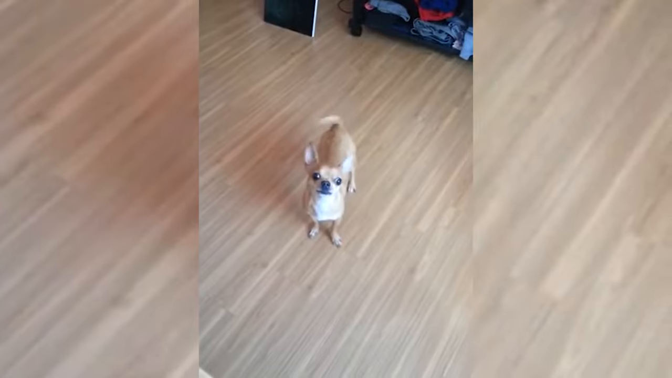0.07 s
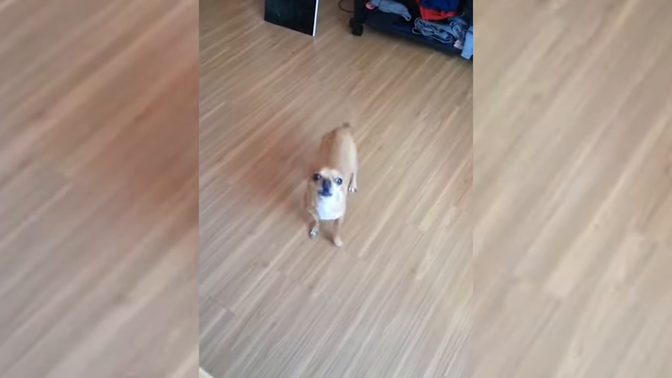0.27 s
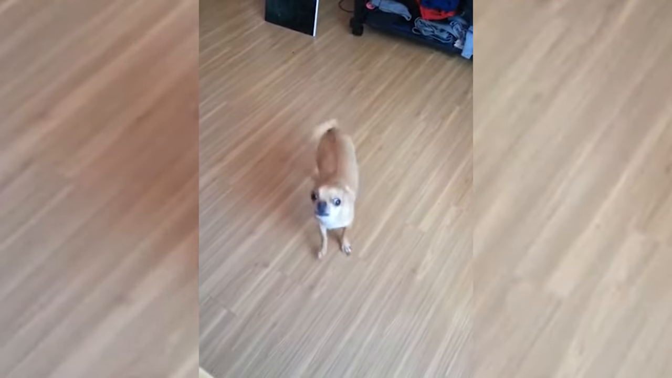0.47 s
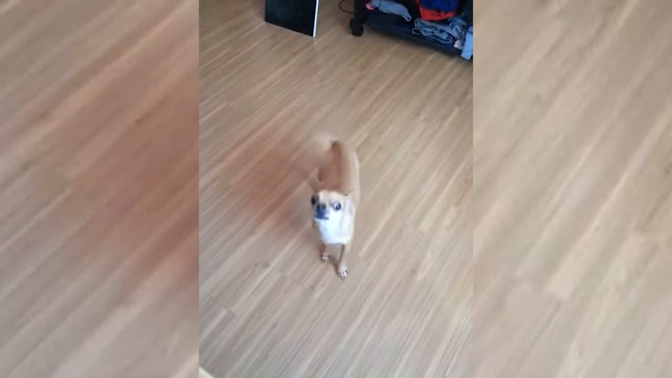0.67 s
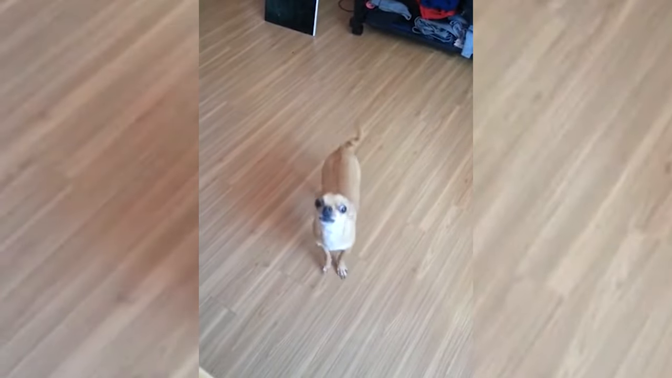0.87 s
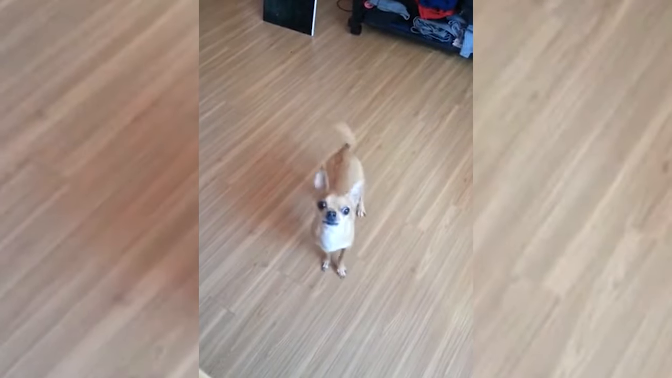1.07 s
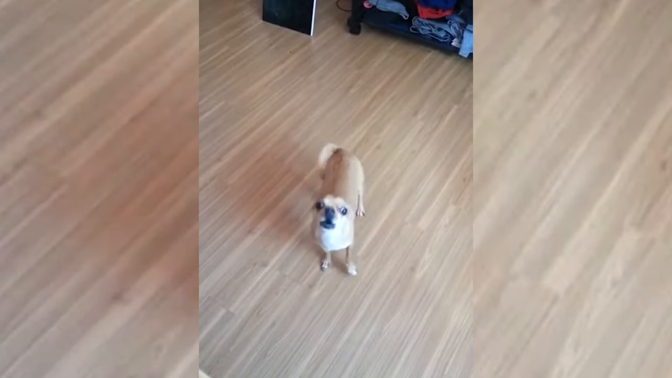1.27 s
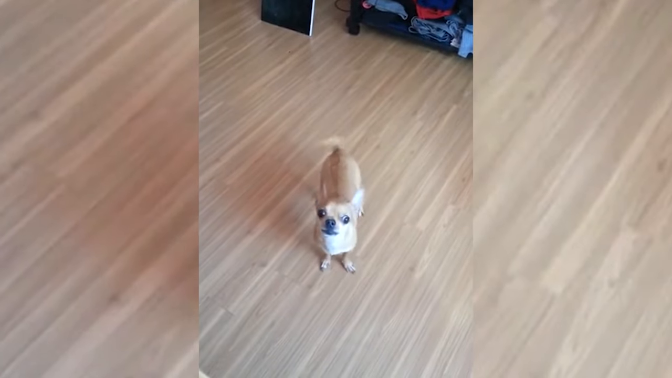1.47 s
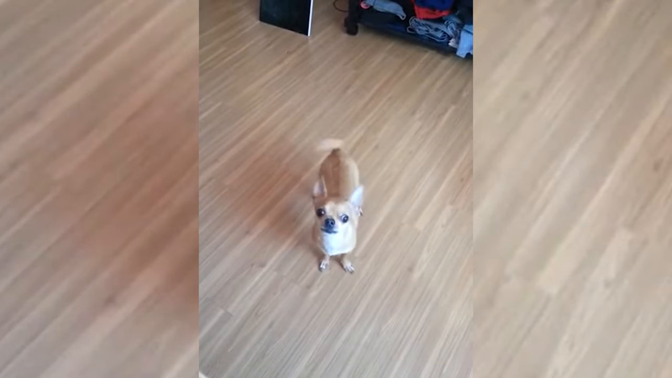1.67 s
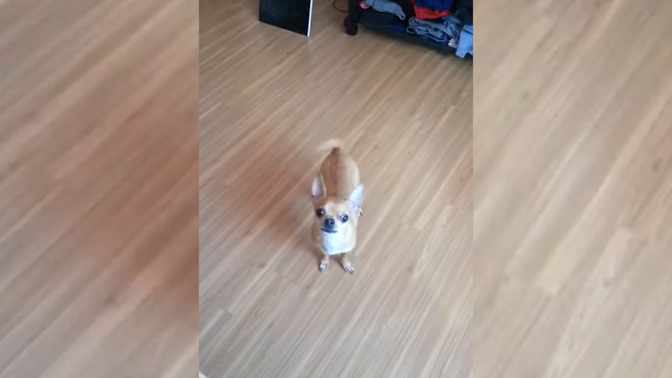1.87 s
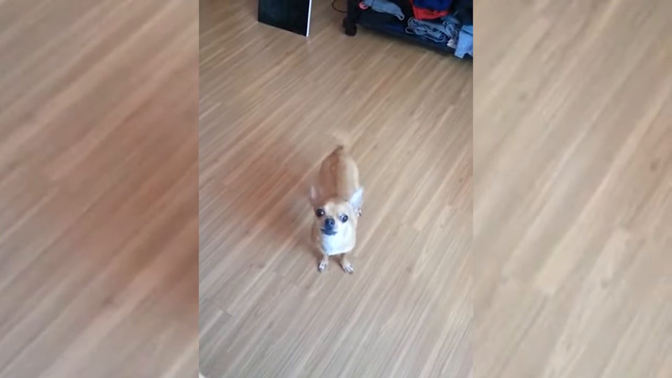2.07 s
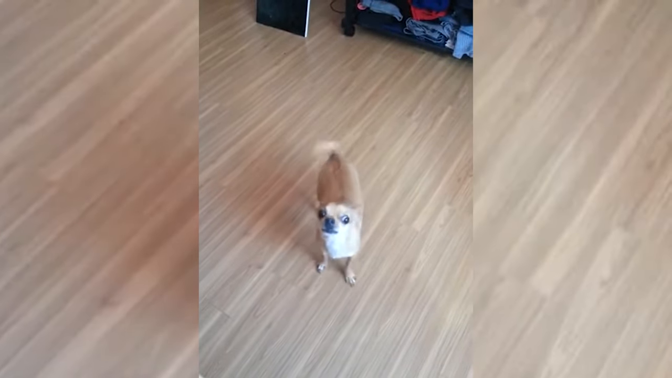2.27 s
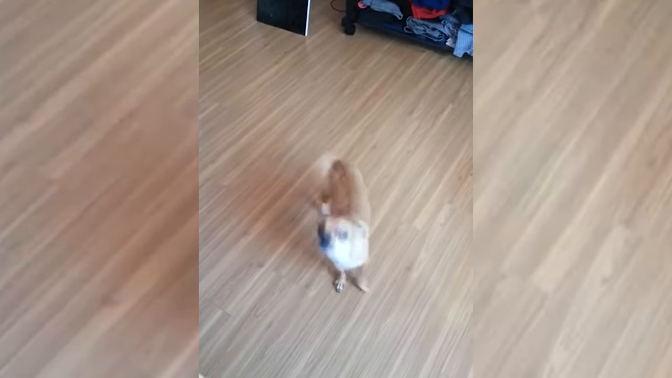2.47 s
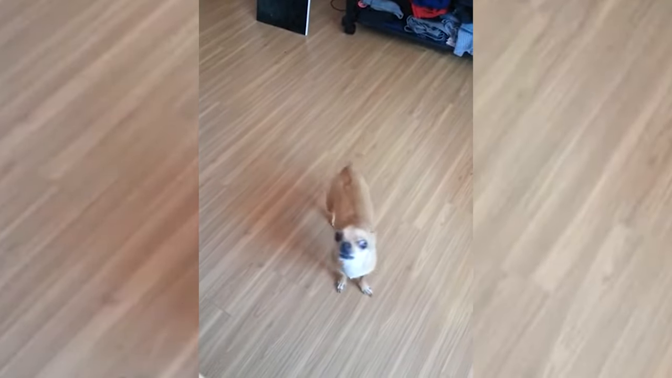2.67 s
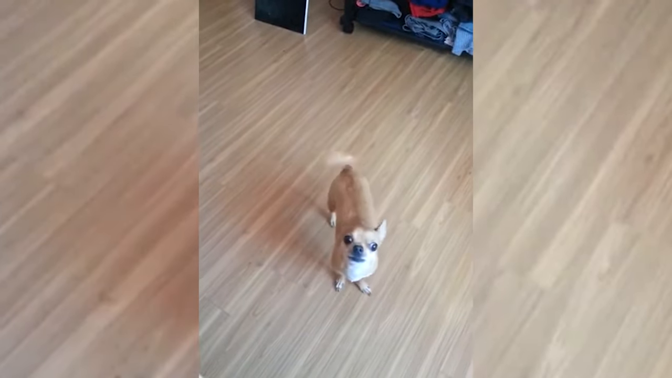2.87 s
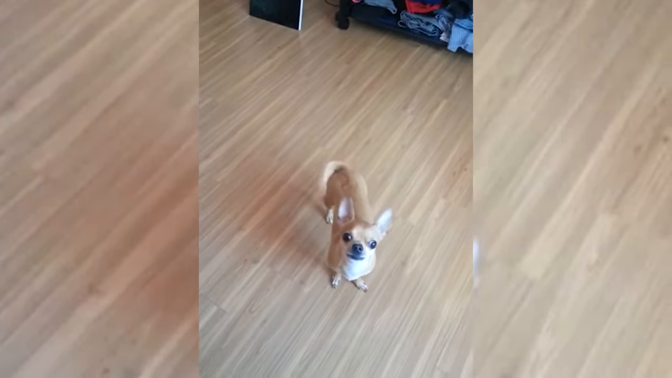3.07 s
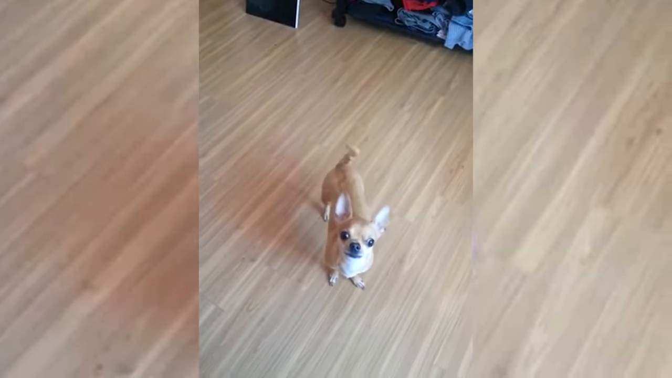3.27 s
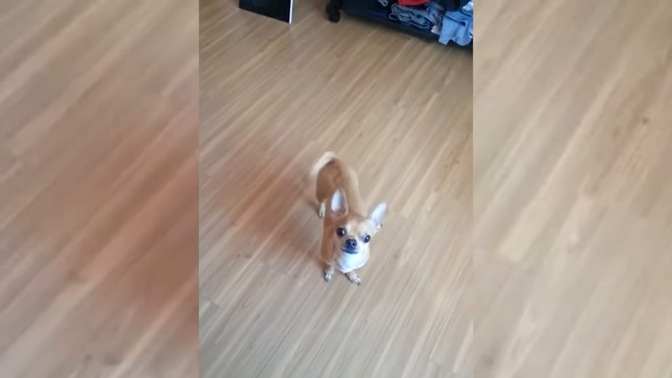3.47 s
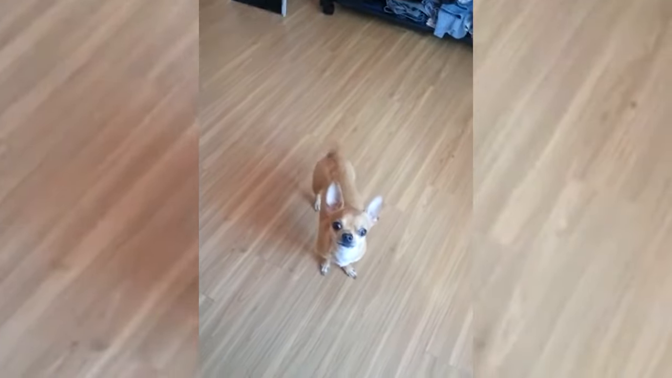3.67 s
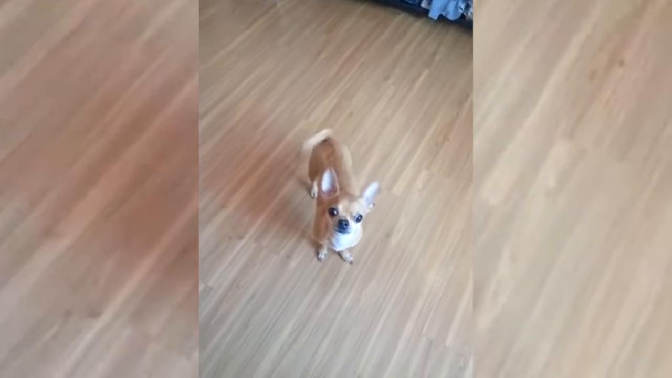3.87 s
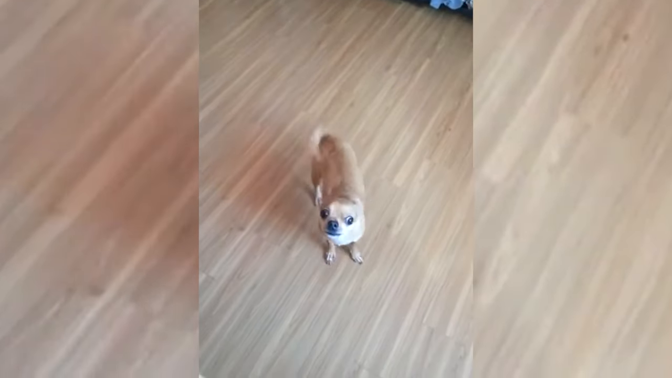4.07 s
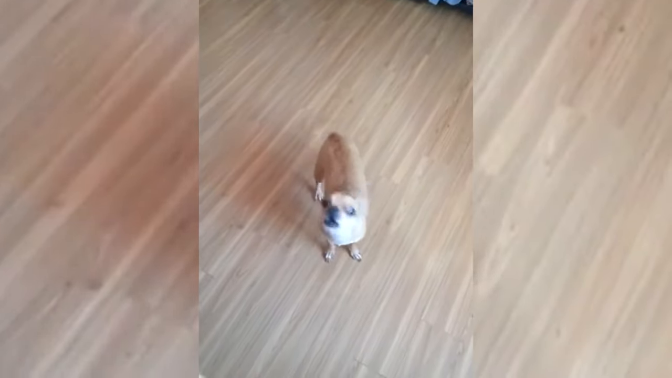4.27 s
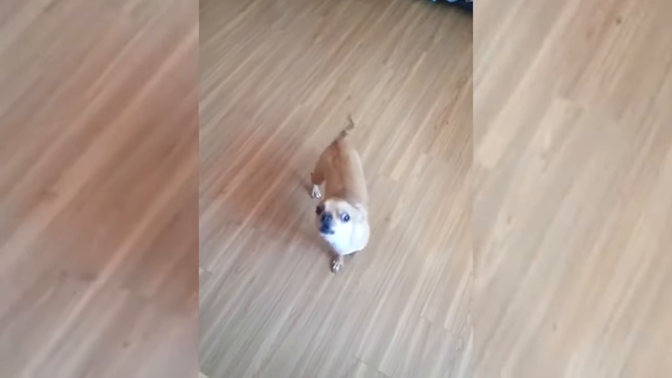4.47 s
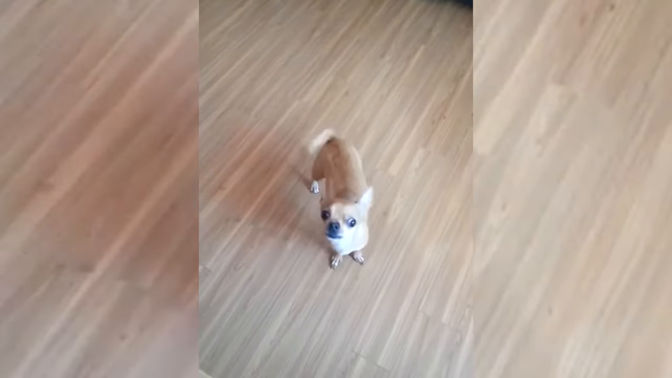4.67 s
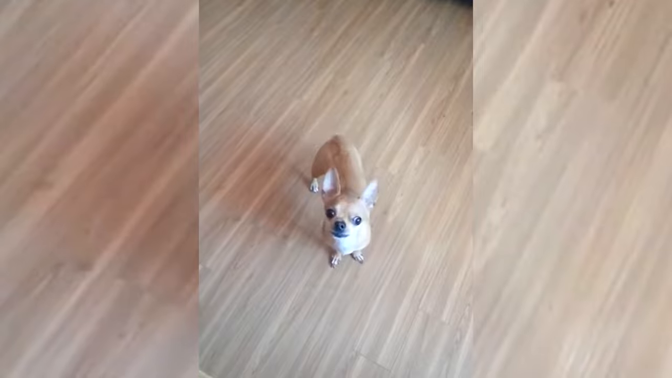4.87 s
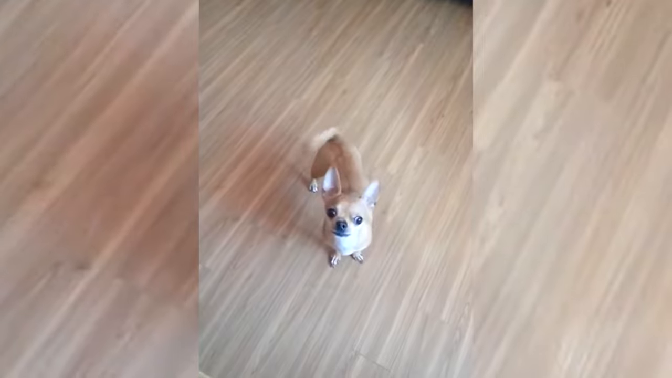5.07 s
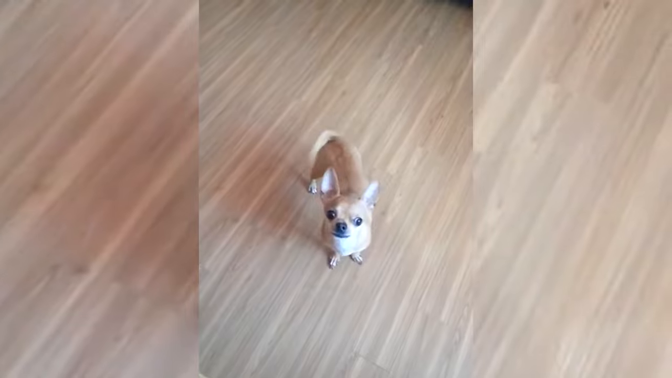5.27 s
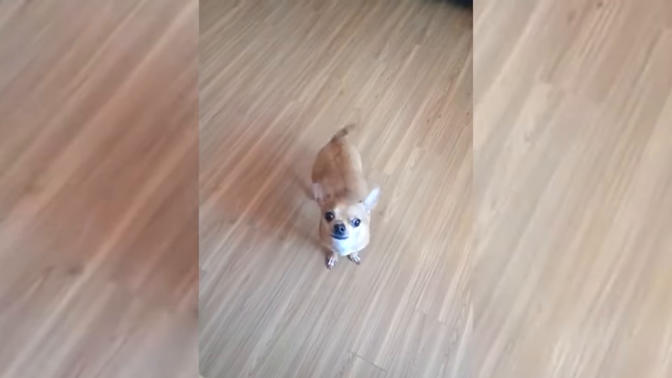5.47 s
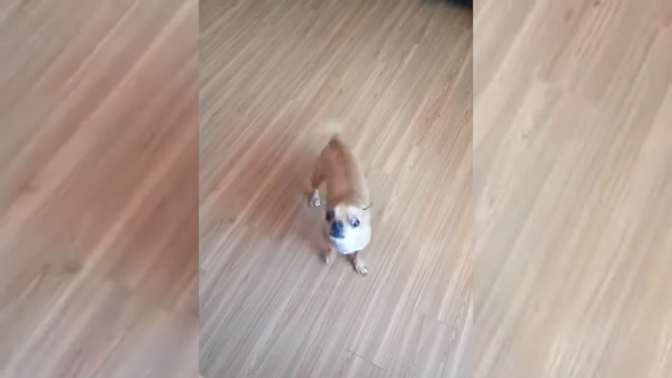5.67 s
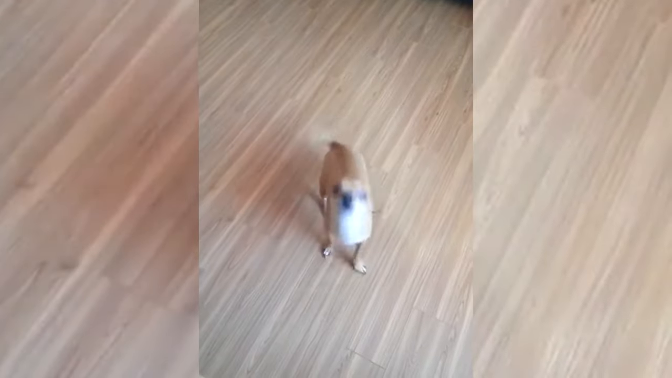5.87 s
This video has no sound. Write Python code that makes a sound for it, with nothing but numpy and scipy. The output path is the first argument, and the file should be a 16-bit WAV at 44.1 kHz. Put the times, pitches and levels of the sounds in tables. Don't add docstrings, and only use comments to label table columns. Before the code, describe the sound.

A small dog barks indoors, very near a phone and slightly to the right. Each bark is short, about 0.15 seconds, jumping up in pitch, cracking roughly, then sagging and fading. Three come quickly at 0.2, 0.45 and 0.7 seconds, followed by a stutter of low, closed-mouth puffs from 0.85 to 1.05 and a single bark at 1.2. A faint shift on the floor comes near 1.7. Three more barks follow at 2.0, 2.3 and 2.5, ending in grumbling puffs until 2.85. Soft scuffs and a tiny tap are heard between 3.2 and 3.7. Barks return at 3.9, 4.2 and 4.4, with weak puffs at 4.6. After light scuffing around 5.2 to 5.4, two last barks strike at 5.5 and 5.7. Thin breathy gasps hiss around the barks. The bare room adds hard reflections and a short decaying tail; loud peaks distort over faint steady air.

```python
import sys
import numpy as np
from scipy import signal
from scipy.fft import rfft, irfft
from scipy.io import wavfile
from scipy.ndimage import uniform_filter1d

SR = 44100
rng = np.random.default_rng(int(sys.argv[2]) if len(sys.argv) > 2 else 0)


def natural_amplitude(level_db):
    exponent = np.asarray(level_db, float) / 20
    return 10 ** exponent


def pcm_store(signal):
    levels = np.round(np.clip(np.atleast_2d(signal), -1, 1) * 32767)
    wavfile.write(sys.argv[1], SR, levels.astype(np.int16).T)


N = 260627

# start_s, length_s, start_effort_db, top_effort_db, rise_s
BARKS = [(0.237, 0.16, -23, -3, 0.029), (0.456, 0.16, -23.5, -4, 0.025), (0.686, 0.12, -14, -7.5, 0.027),
         (1.169, .156, -22, -2.5, 0.046), (2.04, 0.15, -31, -2, 0.034), (2.277, .167, -20, -5.5, .04),
         (2.493, 0.14, -23.5, -7, 0.026), (3.886, 0.15, -31.5, -1, 0.042), (4.187, .164, -21, -2.5, 0.029),
         (4.407, .15, -19, -7.5, 0.047), (5.494, 0.16, -31, -3, 0.028), (5.733, 0.15, -9, -3, 0.024)]
# rise_s, top_hz, settled_hz, end_hz, settled_roughness (0-1)
FOLDS = [(.024, 660, 530, 430, .3), (.022, 690, 428, 350, .05), (.034, 600, 368, 345, .15),
         (.046, 550, 470, 350, .06), (.085, 630, 500, 460, .4), (.044, 480, 410, 370, .12),
         (.028, 540, 385, 355, .07), (.07, 580, 530, 480, .4), (.038, 550, 445, 385, .1),
         (.052, 530, 435, 320, .12), (.036, 570, 470, 530, .15), (.05, 615, 475, 385, .05)]
# centre_hz, width_hz, level_db
THROAT = [
    (1360, 629, 8),
    (2232, 1100, -14),
    (3490, 350, -22.5),
    (6600, 11000, -32.5),
]
# start_s, peak_db, pitch_hz
PUFFS = [(.845, -29, 720), (.868, -18, 650), (.894, -18.5, 637), (0.941, -21, 670), (.978, -22, 744),
         (0.999, -30.5, 727), (1.029, -26.5, 755), (1.151, -16.5, 715), (2.69, -15.5, 600),
         (2.728, -28.5, 522), (2.77, -22, 475), (2.818, -23.5, 566), (4.6, -26, 563), (4.64, -35, 550)]
# peak_s, length_s, level_db
GASPS = [(0.242, 0.037, -39), (.41, 0.093, -38), (0.633, 0.27, -47.5), (0.857, 0.083, -43.5),
         (0.939, 0.063, -39), (2.202, 0.24, -48), (2.427, 0.14, -42), (2.583, 0.092, -40.5),
         (4.104, 0.3, -53), (4.386, 0.096, -38), (4.614, 0.11, -44), (5.466, .07, -41.5),
         (5.714, 0.065, -36.5)]
# frequency_hz, level_db (per Hz)
BREATH_SPECTRUM = [(1500, -18), (3000, -4), (4500, 0), (6500, -3), (9000, -5), (13000, -10), (15000, -40)]
# peak_s, length_s, level_db
SHUFFLES = [
    (1.721, 0.24, -58),
    (2.046, 0.076, -43.5),
    (3.12, .2, -76),
    (3.253, .08, -54.5),
    (3.39, 0.29, -52.5),
    (3.622, .03, -53.5),
    (5.201, .06, -52),
    (5.323, 0.34, -56.5),
]
# frequency_hz, level_db (per Hz)
SCUFF_SPECTRUM = [(60, -39), (120, -12), (300, -8), (900, -5), (1600, -6), (3000, -23.5), (6000, -34)]
# frequency_hz, t60_s
REVERBERATION = [(200, 0.93), (600, 0.41), (1300, 0.46), (2200, 0.37), (3700, 0.22), (9000, 0.037)]
# delay_s, left_db, right_db
REFLECTIONS = [
    (.0012, -20.5, -4),
    (.0052, -7.5, 1.5),
    (.0089, -7.5, -3.5),
    (0.0118, -8, -21.5),
    (0.0186, -16, 8.5),
]
# frequency_hz, level_db (per Hz)
AIR_SPECTRUM = [(25, -24), (60, -22), (120, 0), (300, -4), (1000, -2.5), (2000, -4), (4000, -6),
                (6300, -14), (8500, -8.5), (14200, -11.5)]
# frequency_hz, level_db
MUZZLE = [(40, -61), (150, -26.5), (280, -13.5), (480, -11), (650, 3), (1400, -2), (2400, 1.5), (2900, -2),
          (4000, -6.5), (14000, 3.5)]
MOUTH_FRESH = (0.83, 0.81, 0.93, 0.63)
MOUTH_TIRED = (0.62, 0.84, 0.79, 0.57)

AIR_DB = -52
REST_S = 0.6
SNAP_FRESH, SNAP_TIRED = 2.64, 1.2
FADE_DB, FADE_BEND = -15, 1.08
MIDWAY_AT = 0.51
START_PITCH, EARLY_RISE = 0.77, 0.6
DROP_S, HUMP, HUMP_AT = 0.024, 1.015, 0.2
SAG_AT, SAG_LEFT = 0.7, 1.04
ROUGH_RISE, ROUGH_TOP, ROUGH_END = 0.3, 0.55, 0.6


def bark(row, fold, fresh, wobble=0.2, throb_db=8, tilt_db=-2):
    start, length, *push = row
    t = np.arange(0, length, 1 / SR)
    effort_db, mouth = effort(t, length, *push, fresh)
    hz, rough = folds(t, length, *fold)
    slip_noise, throb_noise, breath = rng.standard_normal((3, 13000))[:, :len(t)]
    slips = evened(smoothed_twice(slip_noise, 120))
    throbs = evened(smoothed_twice(throb_noise, 150))
    turns = np.cumsum(hz * (1 + wobble * rough * slips)) / SR

    slope_db = tilt_db + 0.31 * (effort_db + 16)
    pulses = sum(natural_amplitude(slope_db * np.log2(k)) * np.cos(2 * np.pi * k * turns) for k in range(1, 16))
    escaping_air = (0.18 + np.exp(-(turns % 1) / 0.2)) * breath
    voiced = (1 - rough) * evened(pulses) * natural_amplitude(throb_db * rough * throbs)
    sound = throat(voiced + 0.8 * rough * evened(escaping_air), mouth)

    power = uniform_filter1d(sound ** 2, size=1500)
    return start, natural_amplitude(effort_db) * sound / np.sqrt(power) * signal.windows.tukey(len(t), 0.12)


def effort(t, length, start_db, top_db, rise, fresh):
    up = np.clip(t / rise, 0, 1)
    down = np.clip((t - rise) / (length - rise), 0, 1)
    snap, mouth = (SNAP_FRESH, MOUTH_FRESH) if fresh else (SNAP_TIRED, MOUTH_TIRED)
    effort_db = top_db + (start_db - top_db) * (1 - up) ** snap + FADE_DB * down ** FADE_BEND
    mouth_at = [0, rise, rise + MIDWAY_AT * (length - rise), length]
    return effort_db, np.interp(t, mouth_at, mouth)


def folds(t, length, rise, top_hz, settled_hz, end_hz, calm):
    settled = rise + DROP_S
    left = length - settled
    at = [0, rise / 2, rise, settled, settled + HUMP_AT * left, settled + SAG_AT * left, length]
    start_hz = START_PITCH * settled_hz
    middle_hz = start_hz + EARLY_RISE * (top_hz - start_hz)
    hz = [start_hz, middle_hz, top_hz, settled_hz / HUMP, settled_hz * HUMP, end_hz * SAG_LEFT, end_hz]
    rising = calm + ROUGH_RISE * (ROUGH_TOP - calm)
    rough = [rising, (rising + ROUGH_TOP) / 2, ROUGH_TOP, calm, calm, rising, ROUGH_END]
    return np.interp(t, at, hz), np.interp(t, at, rough)


def throat(drive, mouth):
    sound = 0
    for k, (hz, width, db) in enumerate(THROAT):
        moving_hz = hz * mouth ** (1 / (1 + 2 * k))
        sound = sound + (-1) ** k * natural_amplitude(db) * resonate(drive, moving_hz, width)
    return sound


def puff(hz):
    t = np.arange(1500) / SR
    push = rng.standard_normal(1500) * np.minimum(t / 0.012, 1) * np.exp(-t / 0.0058)
    ring = resonate(push, hz, 450)
    ring = ring + 0.1 * resonate(push, 2.2 * hz, 600)
    ring = ring + 0.9 * resonate(push, 0.6 * hz, 250)
    return ring / abs(ring).max()


def gasps(flutter_db=2.0):
    flutter = natural_amplitude(flutter_db * evened(uniform_filter1d(rng.standard_normal(N), size=500)))
    return swells(GASPS) * flutter * noise(BREATH_SPECTRUM, 0.2)


def room(x, alike=0.38):
    early_db, late_db = -10, -10.5
    taps = np.zeros((2, SR))
    at = np.arange(400, SR - 20, 20) + rng.integers(0, 20, (2, (SR - 401) // 20))
    np.put_along_axis(taps, at, rng.choice([-1., 1.], at.shape), 1)
    taps[1] = alike * taps[0] + np.sqrt(1 - alike ** 2) * taps[1]

    hz, t, z = signal.stft(taps, SR, nperseg=256)
    decay = natural_amplitude(-60 * t / read(REVERBERATION, hz)[:, None])
    tail = signal.istft(z * decay, SR, nperseg=256)[1]
    tail *= natural_amplitude(late_db) / np.linalg.norm(tail, axis=1, keepdims=True)
    for s, left_db, right_db in REFLECTIONS:
        tail[0, round(s * SR)] += natural_amplitude(early_db + left_db)
        tail[1, round(1.04 * s * SR)] += natural_amplitude(early_db + right_db)
    return signal.fftconvolve(x[None], tail, axes=1)[:, :N]


def shuffle():
    grain = natural_amplitude(1.9 * evened(uniform_filter1d(rng.standard_normal(N), size=300)))
    level = uniform_filter1d(swells(SHUFFLES), size=400)
    return level * evened(grain * noise(SCUFF_SPECTRUM, 0.4))


def air():
    return natural_amplitude(AIR_DB) * noise(AIR_SPECTRUM, 0.035)


def noise(spectrum, same):
    a, b = rng.standard_normal((2, N))
    pair = np.array([a, same * a + np.sqrt(1 - same ** 2) * b])
    return evened(coloured(pair, spectrum))


def coloured(x, spectrum):
    return irfft(rfft(x) * natural_amplitude(read(spectrum, np.fft.rfftfreq(N, 1 / SR))), N)


def resonate(x, hz, width):
    turn = np.exp(2j * np.pi * np.cumsum(hz * np.ones(len(x))) / SR)
    r = np.exp(-np.pi * width / SR)
    smooth = signal.lfilter([(1 - r) ** 2], [1, -2 * r, r * r], x / turn + 1e-18)
    return 2 * (turn * smooth).real


def swells(events):
    t = np.arange(N) / SR
    return sum(natural_amplitude(db) * np.exp(-(2 * (t - s) / length) ** 2) for s, length, db in events)


def smoothed_twice(x, size):
    return uniform_filter1d(uniform_filter1d(x, size=size), size=size)


def evened(x):
    return x / np.sqrt(np.mean(x ** 2) + 1e-20)


def read(points, hz):
    f, value = np.transpose(points)
    return np.interp(np.log(hz + 1), np.log(f + 1), value)


def add(mix, s, sound):
    part = mix[round(s * SR):][:len(sound)]
    part += sound[:len(part)]


def scene():
    dog = np.zeros(N)
    pauses = np.diff([row[0] for row in BARKS], prepend=-1)
    for row, fold, pause in zip(BARKS, FOLDS, pauses):
        add(dog, *bark(row, fold, pause > REST_S))
    for s, db, hz in PUFFS:
        add(dog, s, natural_amplitude(db) * puff(hz))
    dog = coloured(dog, MUZZLE)
    direct = np.array([np.roll(dog, shift=2), dog])
    port_gains = natural_amplitude(np.array([[-0.6], [0.2]]))
    return port_gains * (direct + room(dog)) + gasps() + shuffle() + air()


def masked(x, under_db=-50, blotch_db=6, low_hz=170, high_hz=8600, edge_hz=14400):
    hz, t, z = signal.stft(x, SR, nperseg=1024, noverlap=512)
    loudest = abs(z).max(1, keepdims=True)
    blotch = np.repeat(rng.standard_normal((len(t), 65)), 8, axis=1)[:, :len(hz)].T
    outer = ((hz < low_hz) | (hz > high_hz))[:, None]
    faint = abs(z) < natural_amplitude(under_db + blotch_db * blotch) * loudest
    dropped = outer & faint | (hz > edge_hz)[:, None]
    return signal.istft(np.where(dropped, 0, z), SR, nperseg=1024, noverlap=512)[1][:, :N]


def low_pass(x):
    return signal.sosfilt(signal.butter(12, 15300, fs=SR, output="sos"), x)


def record(dry):
    overloaded = np.clip(dry, -0.97, 0.97)
    mix = np.clip(masked(overloaded), -1, 1)
    return low_pass(mix)


dry = scene()
out = record(dry)
pcm_store(out)
```